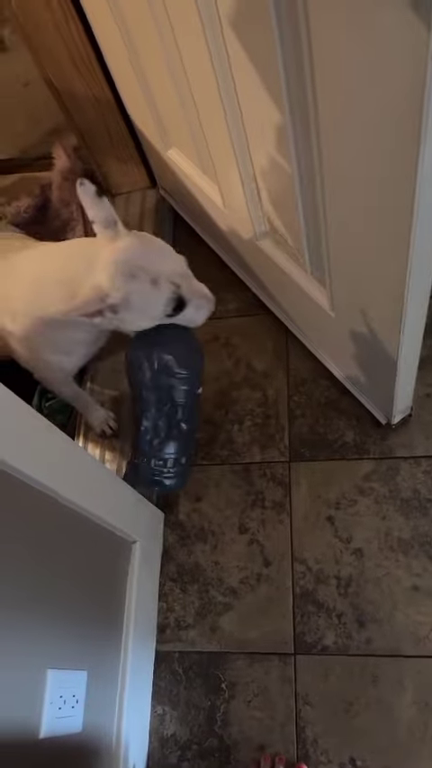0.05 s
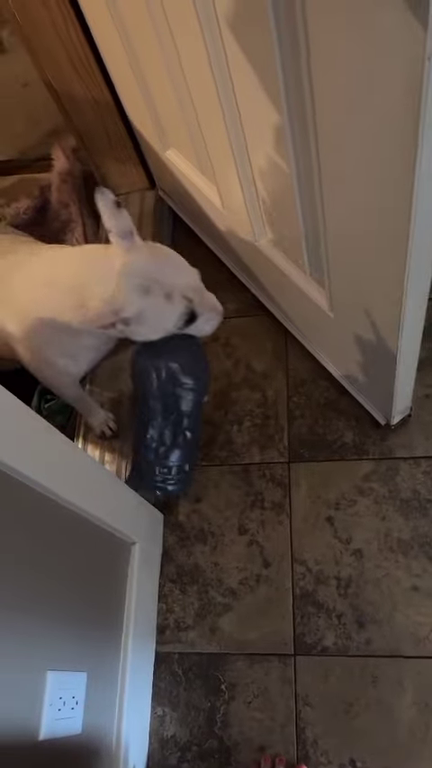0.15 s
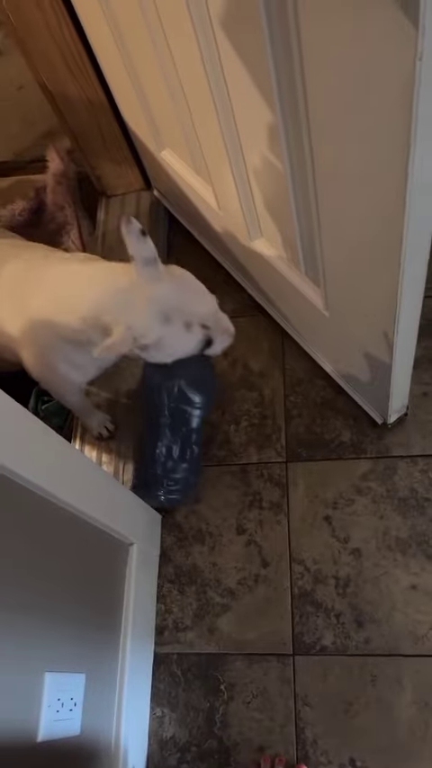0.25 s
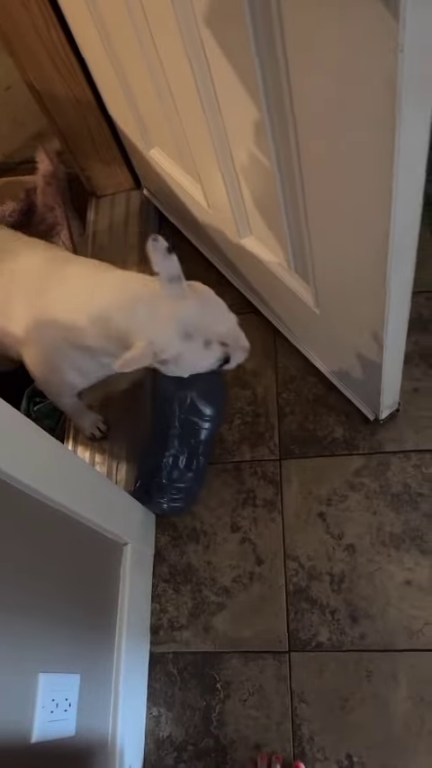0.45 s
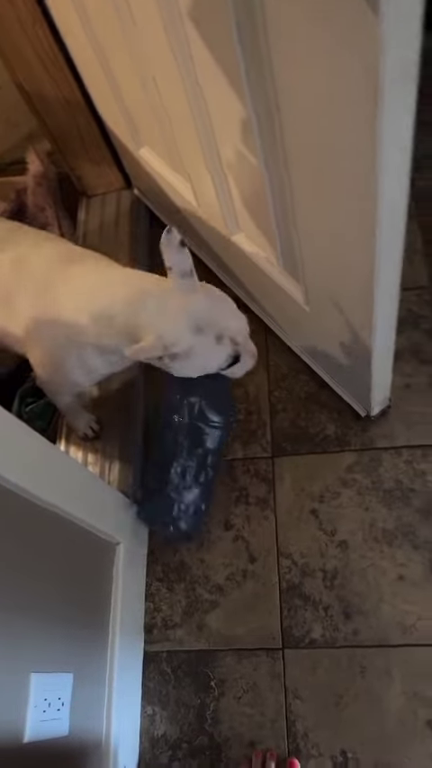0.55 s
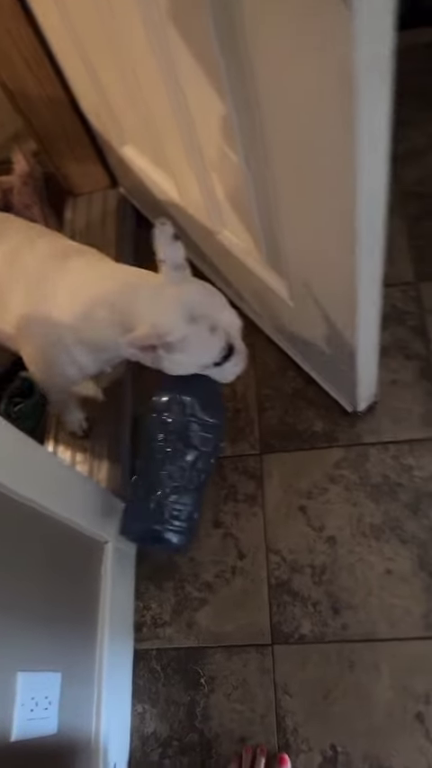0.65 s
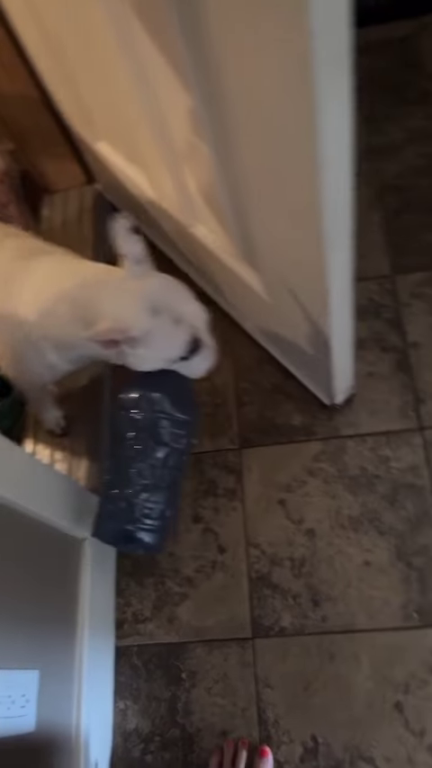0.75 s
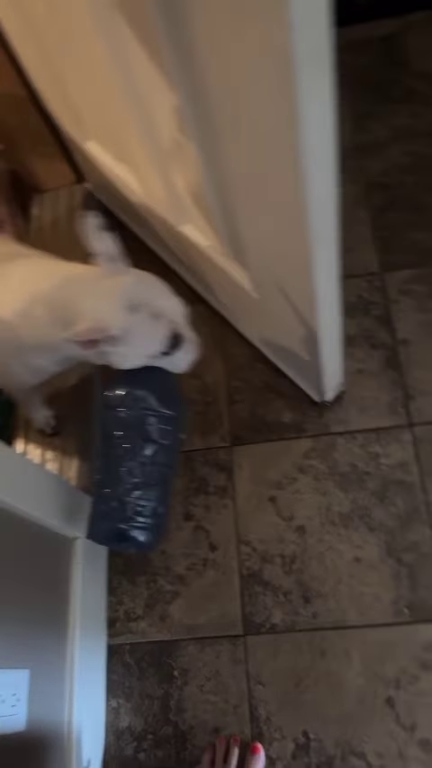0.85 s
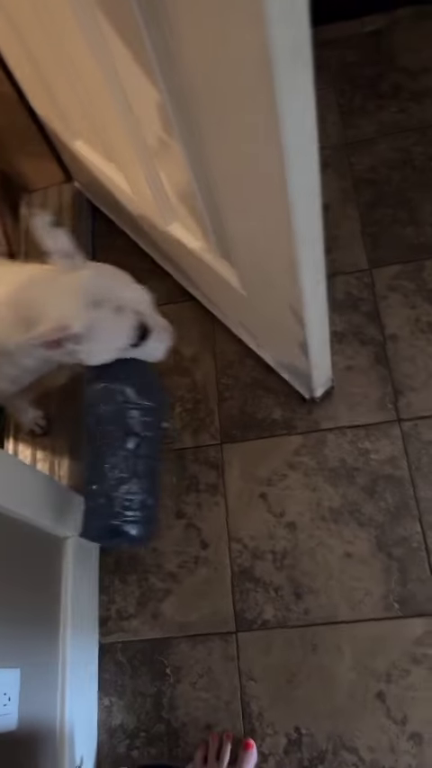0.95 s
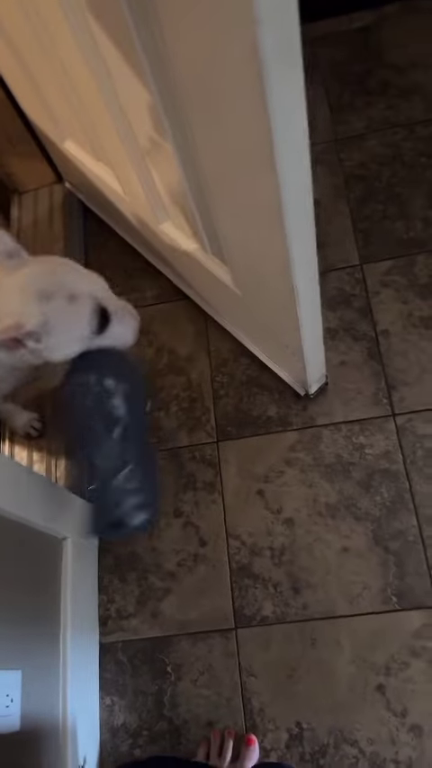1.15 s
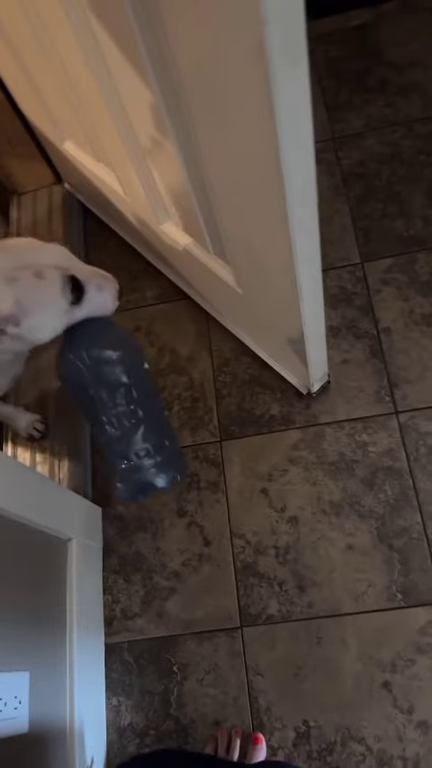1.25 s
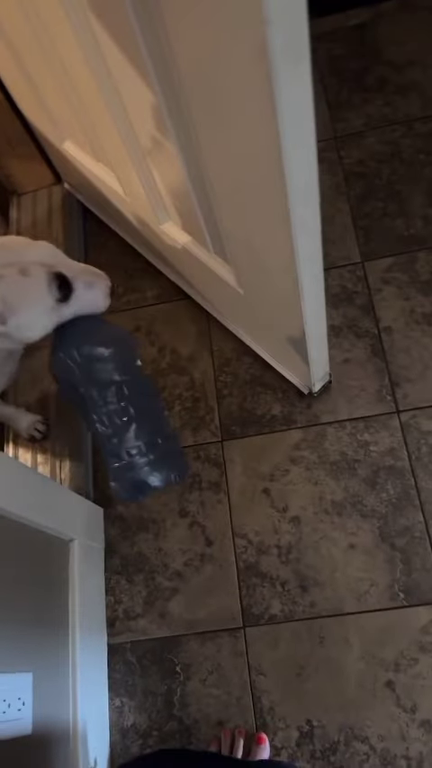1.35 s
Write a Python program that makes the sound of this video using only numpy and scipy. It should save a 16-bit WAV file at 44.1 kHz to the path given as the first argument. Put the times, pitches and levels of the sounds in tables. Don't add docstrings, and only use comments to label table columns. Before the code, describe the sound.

A hollow plastic toy dragged by a dog scrapes a door edge: almost quiet at first, stuttering slips from about 0.12 s, dense rattling from 0.2 to 0.45 s, with a hollow pop and sharp crack near 0.35 s. Loud double knock on the hollow door at 0.57-0.61 s, rebounds until 0.75 s. Then short room echo, faint claw and teeth ticks, soft toy taps around 1.0-1.35 s, low house rumble.

```python
import sys
import numpy as np
from scipy import signal
from scipy.fft import rfft, irfft
from scipy.io import wavfile
from scipy.ndimage import uniform_filter1d

SR = 44100
rng = np.random.default_rng(int(sys.argv[2]) if len(sys.argv) > 2 else 0)


def generate_wav(signal):
    frames = np.transpose(np.atleast_2d(signal))
    scaled = np.clip(frames, -1, 1) * 32767
    pcm = np.round(scaled).astype(np.int16)
    wavfile.write(sys.argv[1], SR, pcm)


def attenuation_scalar(level_db):
    decades = np.asarray(level_db, float) / 20
    return 10 ** decades


N = 61739
T = np.arange(N) / SR


def table(rows, hz):
    rows = np.array(rows, float)
    return np.interp(np.log(np.maximum(hz, 1)), np.log(rows[:, 0]), rows[:, 1])


def unit(x):
    return x / np.sqrt(np.mean(x ** 2))


def shape(x, gain):
    n = x.shape[-1]
    return irfft(rfft(x) * gain(np.arange(n // 2 + 1) * SR / n), n)


def octaves_from(hz, centre_hz):
    return np.log2(np.maximum(hz, 1) / centre_hz)


def walk(rate_hz):
    k = int(SR / rate_hz)
    steps = np.repeat(rng.standard_normal(N // k + 1), k)
    return 0.97 * uniform_filter1d(uniform_filter1d(steps, k), k)[:N]


def push(contact_ms):
    phase = (np.arange(256) + .5) / (max(contact_ms, .05) * SR / 1000)
    force = np.sin(np.pi * np.clip(phase, 0, 1))
    return force / force.sum()


def blows(rows):
    force = np.zeros(N + 256)
    for start_s, level_db, contact_ms in rows:
        i = int(start_s * SR)
        force[i:i + 256] += attenuation_scalar(level_db - 6.5) * push(contact_ms)
    return force[:N]


def ring(force, modes):
    wobble_db, wobble_hz, max_cycles = 1.5, 34.87, 75
    out = 0
    for pitch_hz, level_db, t60_s in modes:
        t60_s = np.clip(t60_s, .01, max_cycles / pitch_hz)
        pole = np.exp(2j * np.pi * pitch_hz / SR - np.log(1000) / (t60_s * SR))
        mode = signal.lfilter([1], [1, -pole], force).imag
        out = out + attenuation_scalar(level_db + wobble_db * walk(wobble_hz)) * mode
    return out


# pitch_hz, side_db
SIDE_COLOUR = [(60, -32), (250, -15), (500, -7), (1000, 1), (4000, -1), (14000, 1.5)]


def wide(mid, side):
    side = shape(side, lambda f: attenuation_scalar(table(SIDE_COLOUR, f)))
    return np.array([mid + side, mid - side])


# start_s, judder_db, grit_db
DRAG_PATH = [(0, -42, -42.5), (0.057, -58, -56), (0.127, -47, -53.5), (.138, -40.5, -52),
             (0.224, -28.5, -38.5), (.3, -30.5, -40), (0.416, -34.5, -42.5), (0.499, -45.5, -55),
             (0.543, -49, -44), (0.571, -23.5, -34.5), (0.628, -33, -42.5), (.73, -46, -49.5),
             (.86, -54, -60), (1.101, -76, -60), (1.17, -60, -82), (1.4, -68, -66)]
# pitch_hz, level_db
GRIT_COLOUR = [(300, -2.5), (1100, -0.5), (1500, -1.5), (2000, -4.5), (2600, -3), (3700, -7), (5500, -17),
               (15000, -25)]


def drag():
    slip_hz, slip_jitter, slip_scatter_db, slip_ms, slip_noise = 95, .3, 1.5, .4, .06
    grain_scatter_db, grains_per_s, flicker_db, flicker_hz = .5, 6000, 1.5, 37.9
    start_s, judder_db, grit_db = np.array(DRAG_PATH).T
    chance = rng.standard_normal((400, 2))
    at = (np.cumsum(np.exp(slip_jitter * chance[:, 0])) * SR / slip_hz).astype(int)
    jolts = np.zeros(N)
    jolts[at[at < N]] = attenuation_scalar(slip_scatter_db * chance[at < N, 1])
    jolts = jolts + slip_noise * rng.standard_normal(N)
    jolts = np.convolve(jolts, push(slip_ms))[:N] * attenuation_scalar(np.interp(T, start_s, judder_db))
    grains = (rng.random(N) < grains_per_s / SR) * rng.standard_normal(N)
    grains = grains * attenuation_scalar(grain_scatter_db * rng.exponential(size=N))
    grit = unit(shape(grains, lambda f: attenuation_scalar(table(GRIT_COLOUR, f))))
    return jolts, grit * attenuation_scalar(np.interp(T, start_s, grit_db) + flicker_db * walk(flicker_hz))


# start_s, level_db, contact_ms
EDGE_SLIPS = [(.119, -33, 0.76), (.136, -32, 1.5), (.156, -32, 0.33), (.167, -33, 0.59), (.178, -39, 1),
              (.188, -22, 1.6), (.200, -13.5, 1.63), (.209, -29.5, 0.41), (.216, -16.5, 0.69),
              (.226, -28.5, 0.21), (.234, -18, 0.32), (.244, -18, 0.53), (.254, -17, 0.57),
              (.262, -19.5, 1.3), (.281, -13, 0.36), (.293, -19, 0.48), (.301, -16.5, 0.46),
              (.316, -18.5, 0.53), (.325, -17.5, 0.98), (.331, -14.5, 0.69), (.341, -19, 0.27),
              (.350, -14, 0.46), (.364, -14, 0.61), (.376, -12.5, 0.62), (.402, -23.5, 0.69),
              (.420, -14.5, 0.67), (.427, -21, 0.65), (.437, -21, 0.65), (.453, -29, 0.53)]
# pitch_hz, level_db, t60_s
PINCHED_MODES = [(261.4, -11, 0.14), (398, 3.5, 0.037), (447.2, -1, 0.14), (501.4, -2, 0.14),
                 (575, -2.5, 0.067), (652, -4.5, 0.042), (730, -15.5, 0.1), (943, -10.5, 0.042),
                 (1160, -10.5, 0.081), (1230, -34, 0.12), (1838, -8.5, 0.046), (2060, -12.5, 0.066),
                 (2424, -6, 0.1)]


def pinched_toy(jolts):
    low_hz = 183
    rub = ring(jolts + blows(EDGE_SLIPS), PINCHED_MODES)
    return shape(rub, lambda f: 1 / (1 + (low_hz / np.maximum(f, 1)) ** 4))


# start_s, level_db, contact_ms
TOY_POPS = [(.002, -28, 1.04), (.337, -2.5, 5.8), (.349, -23.5, 0.19), (.3615, -10, 0.63), (.374, -6, 1.38),
            (.393, -5, 1.56), (.4035, -13, 1.9), (.4085, -11, 1.98), (.434, -9, 2.76), (.462, -15.5, 2.26),
            (.468, -51, 1.7), (.487, -25.5, 1.4), (.497, -20.5, 3.2), (.512, -33, 2.4), (1.013, -40, 0.84),
            (1.057, -32, 2.28), (1.152, -58, 3.4), (1.243, -34, 2.1), (1.295, -30, 3.5)]
# pitch_hz, level_db, t60_s
FREE_TOY_MODES = [(78.2, -6, 0.32), (200, -50, 0.41), (249.66, 1.5, 0.34), (298.8, -0.5, 0.29),
                  (394.4, 1.5, 0.097), (468, -32, 0.13), (459.6, 1.5, 0.099), (580, -10, 0.15),
                  (686, -9, 0.15), (770, -55, 0.068), (1050, -10, 0.057)]


def free_toy():
    return ring(blows(TOY_POPS), FREE_TOY_MODES)


# start_s, level_db, contact_ms
DOOR_BUMPS = [(.549, -21, 0.29), (.553, -16.5, 0.91), (.557, -30, 0.25), (.565, -21.5, 0.63),
              (.5733, -13, 0.83), (.5754, -1.5, 0.64), (.5795, -3.5, 3.3), (.588, -12.5, 1.44),
              (.594, -8, 0.69), (.6041, -0.5, 1.33), (.6125, -5, 0.26), (.6174, -9, 0.96),
              (.6247, -7, 1.08), (.628, -7, 1.28), (.641, -12.5, 2), (.647, -7, 1.77), (.658, -19, 1.6),
              (.6725, -6.5, 1.62), (.683, -18, 1.7), (.6961, -24, 1.8), (.7065, -28.5, 1.2),
              (.731, -22.5, 3), (.750, -31, 3)]
# pitch_hz, level_db, t60_s
DOOR_MODES = [(88, -13, 0.17), (162, -6.5, 0.11), (209.6, -9.5, 0.48), (243.3, -8, 0.37), (289.9, -11, 0.3),
              (325.6, -6, 0.22), (388, -7, 0.044), (429, -4, 0.096), (480, -26, 0.18), (564.3, -10, 0.1),
              (619, 1, 0.058), (665.5, -2.5, 0.15), (763, -18, 0.15), (918, -21.5, 0.098)]


def door():
    return ring(blows(DOOR_BUMPS), DOOR_MODES)


# start_s, level_db, free_ring_s
PANEL_BLOWS = [
    (0.5758, -12, 0.026),
    (0.6049, -5.5, 0.025),
    (.6679, -17, 0.033),
]


def panel():
    pitch_hz, t60_s, rise_ms, still_ms = 383.2, 0.31, 1.8, 8
    out = 0
    for start_s, level_db, free_ring_s in PANEL_BLOWS:
        t = np.maximum(T - start_s, 0)
        rise = 1 - np.exp(-1000 * t / rise_ms)
        still = np.exp(-1000 * np.maximum(t - free_ring_s, 0) / still_ms)
        note = np.sin(2 * np.pi * pitch_hz * t)
        out = out + attenuation_scalar(level_db - 60 * t / t60_s) * rise * still * note
    return out


# start_s, level_db, centre_hz, width_octaves, t60_ms
CRACKS = [(0.0018, -48, 7150, 0.91, 304), (0.3624, -16.5, 6500, 0.57, 21), (0.3626, -17, 14000, 2.9, 27),
          (0.3627, -22.5, 2180, 1.53, 57), (0.366, -23.5, 10360, 0.5, 37), (0.28, -57, 10900, 0.58, 30),
          (.485, -29.5, 900, 0.94, 52), (0.133, -44, 1900, 0.83, 89), (0.62, -48.5, 2400, 0.67, 100),
          (0.5418, -30, 5100, 1.8, 11), (.549, -30, 890, 1.44, 400), (0.5729, -22, 1610, 1.37, 42),
          (0.574, -38, 5800, 0.79, 19), (0.6119, -17, 1780, 0.96, 37.5), (0.6115, -32, 3800, 2.9, 144)]
# start_s, level_db, centre_hz, width_octaves, t60_ms
MORE_TICKS = [(0.9707, -56, 2900, 0.72, 90), (0.973, -55, 3670, 0.32, 19),
              (1.036, -57.5, 11300, 2.7, 160), (1.053, -52, 14600, 0.3, 32),
              (1.055, -59, 7150, 1.6, 33), (1.075, -63, 10900, 3.2, 13),
              (1.078, -40.5, 11700, 1.7, 27), (1.089, -45.5, 7800, 0.49, 32),
              (1.096, -52, 9600, 3.6, 120), (1.19, -48, 2880, 0.19, 38),
              (1.2135, -49.5, 7340, 2.8, 26), (1.215, -48, 2010, 0.35, 47),
              (1.227, -52, 1620, 0.22, 110), (1.216, -48.5, 1460, 1.14, 130),
              (1.222, -63, 5460, 2.5, 220), (1.327, -58.5, 2350, 0.73, 110),
              (1.342, -61.5, 6040, 1.2, 57), (0.359, -35.5, 12500, 3.6, 54),
              (.5418, -30, 3000, 1.9, 29), (1.191, -52.5, 2500, 0.91, 57), (1.243, -64, 6200, .8, 40),
              (1.261, -56, 1607, .6, 34), (1.297, -55, 1650, .6, 25), (1.330, -62, 4200, 0.42, 35),
              (.369, -26.5, 9100, 1.2, 14)]


def ticks():
    size = 8192
    out, t = np.zeros(N + size), np.arange(size) / SR
    for start_s, level_db, centre_hz, width_octaves, t60_ms in [*CRACKS, *MORE_TICKS]:
        noise = rng.standard_normal(size)
        band = unit(shape(noise, lambda f: np.exp(-2 * (octaves_from(f, centre_hz) / width_octaves) ** 2)))
        attack = np.clip(t * centre_hz * width_octaves / 2, 0, 1)
        i = int(start_s * SR)
        out[i:i + size] += attenuation_scalar(level_db - 60000 * t / t60_ms) * attack * band
    return out[:N]


# pitch_hz, t60_s
HALL_DECAY = [(90, 0.61), (250, 0.45), (700, 0.46), (2000, 0.13), (6000, 0.35), (13000, 0.12)]


def hall(x):
    lag_ms = 0.83
    t = np.arange(32768) / SR
    tail = 0
    for pitch_hz, t60_s in HALL_DECAY:
        noise = rng.standard_normal((2, len(t)))
        band = shape(noise, lambda f: np.exp(-(octaves_from(f, pitch_hz) / 1.47) ** 2))
        tail = tail + band * attenuation_scalar(-60 * t / t60_s)
    tail = tail * np.clip(t * 1000 / lag_ms - .5, 0, 1)
    mid, side = tail / np.sqrt(np.sum(tail[0] ** 2))
    return signal.fftconvolve(x[None], wide(mid, side), axes=1)[:, :N]


# pitch_hz, level_db_per_hz
HOUSE_COLOUR = [(26, -51), (45, 1.5), (250, -10), (408, -20), (733, -24), (809, -25.5), (914, -30),
                (1200, -38), (15600, -75)]


def house():
    level_db, pan_db = -39.5, -1.2
    out, swell_db = 0, walk(6.2)
    for pitch_hz in 30 * 2 ** np.arange(0, 9.1, .5):
        colour = lambda f: attenuation_scalar(table(HOUSE_COLOUR, f)) * np.exp(-(octaves_from(f, pitch_hz) / 0.35) ** 2)
        noise = shape(rng.standard_normal((2, N)), colour)
        out = out + noise * attenuation_scalar(swell_db + 2.2 * walk(11.0))
    return unit(wide(*out)) * attenuation_scalar(level_db + np.array([[.5], [-.5]]) * pan_db)


# pitch_hz, phase_rad
PORT_LEAD = [(100, 0.1), (400, -0.41), (860, 1.5), (1300, -.6), (3000, 1.38), (6000, 0.5), (8500, -2),
             (13000, 1)]
# pitch_hz, level_db
PORT_BALANCE = [(60, 0), (110, -1.2), (200, 1), (380, -2.5), (700, -1.5), (1290, 1.5), (2380, -1),
                (4400, 0.5), (8120, 1.2), (15000, 0)]


def ports(x):
    def port(side):
        gain = lambda f: attenuation_scalar(side * table(PORT_BALANCE, f) / 2)
        lead = lambda f: np.exp(.5j * side * table(PORT_LEAD, f))
        return shape(x, lambda f: gain(f) * lead(f))
    return np.array([port(1), port(-1)])


def scene():
    radiate_hz, body_hall_db, tick_hall_db = 81, -12, -10.5
    jolts, grit = drag()
    body = pinched_toy(jolts) + free_toy() + door() + panel()
    body = signal.sosfilt(signal.butter(2, radiate_hz, "high", fs=SR, output="sos"), body)
    bright = ticks() + grit
    echo = hall(attenuation_scalar(body_hall_db) * body + attenuation_scalar(tick_hall_db) * bright)
    return ports(body + bright) + echo + house()


def top_cut(x):
    return signal.sosfilt(signal.butter(12, 15800, fs=SR, output="sos"), x)


def record(dry):
    ceiling, low_hz, top_hz = 0.86, 46, 15600
    mix = ceiling * np.tanh(dry / ceiling)
    mix = signal.sosfilt(signal.butter(3, low_hz, "high", fs=SR, output="sos"), mix)
    mix = signal.sosfilt(signal.ellip(8, .2, 70, top_hz, fs=SR, output="sos"), mix)
    return top_cut(mix)


dry = scene()
out = record(dry)
generate_wav(out)
```